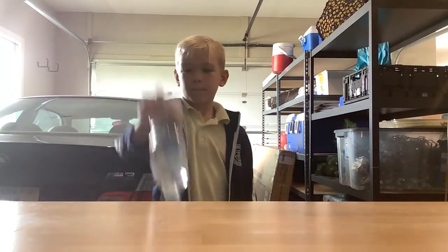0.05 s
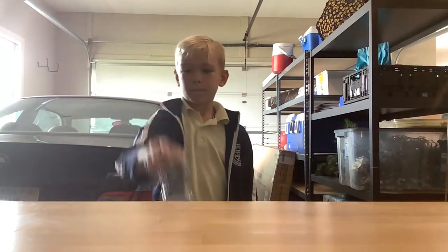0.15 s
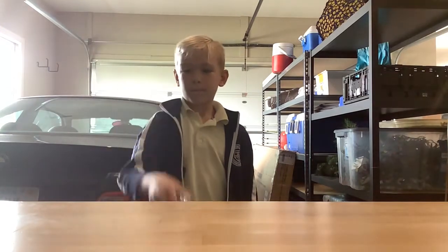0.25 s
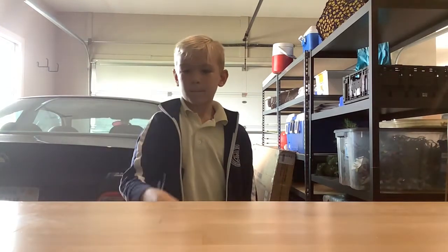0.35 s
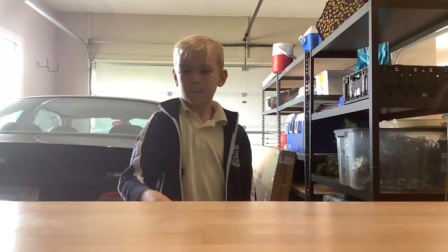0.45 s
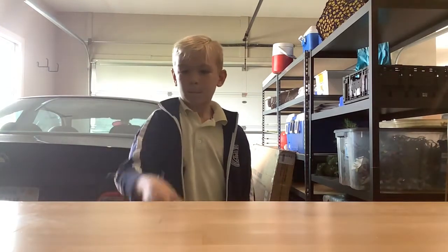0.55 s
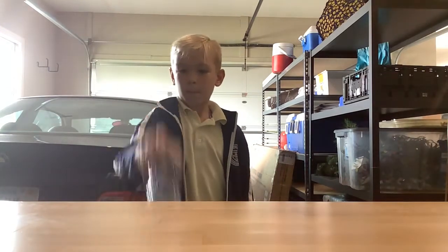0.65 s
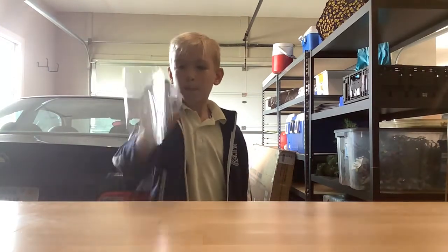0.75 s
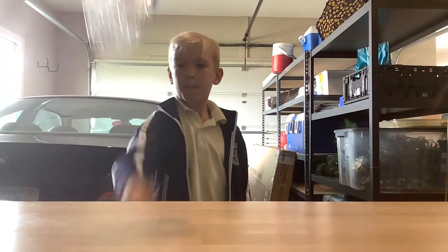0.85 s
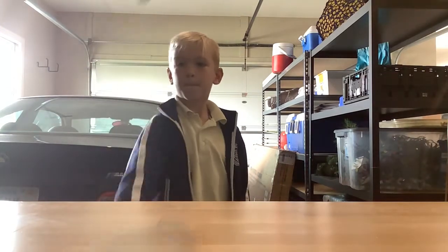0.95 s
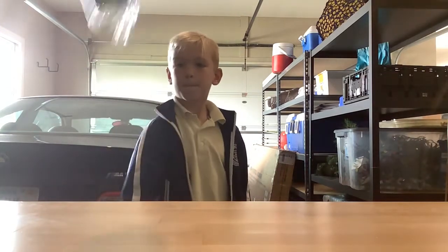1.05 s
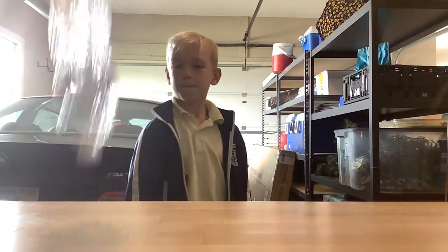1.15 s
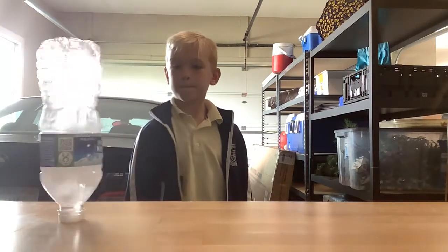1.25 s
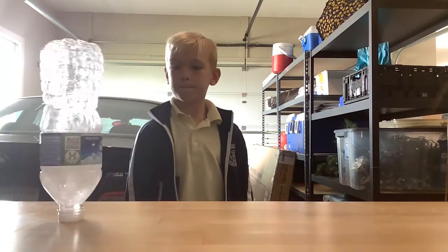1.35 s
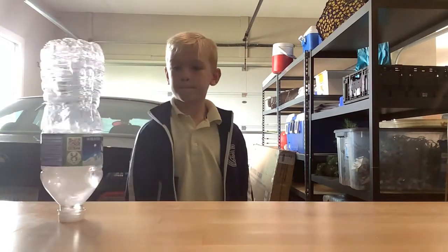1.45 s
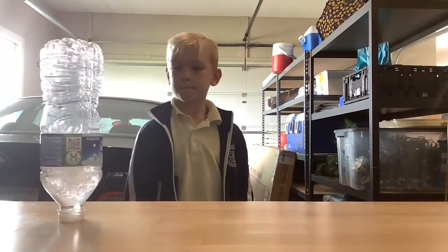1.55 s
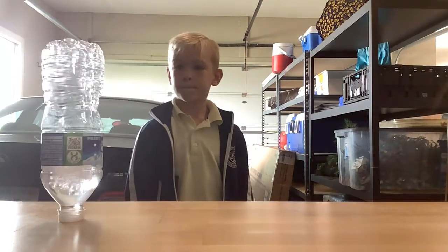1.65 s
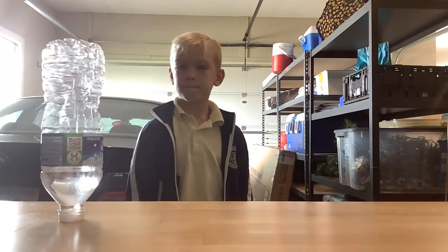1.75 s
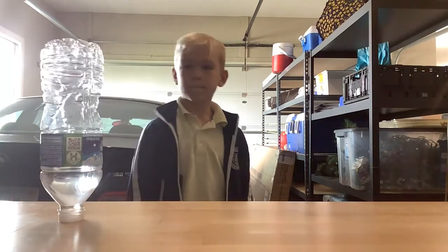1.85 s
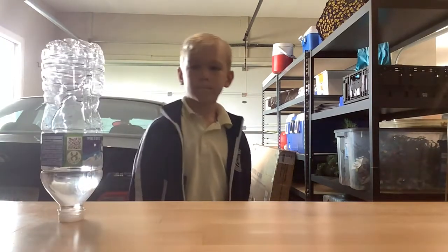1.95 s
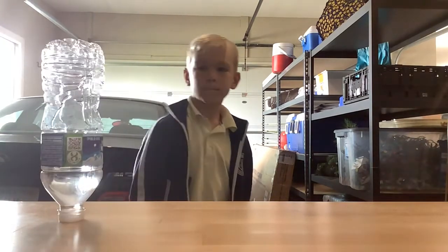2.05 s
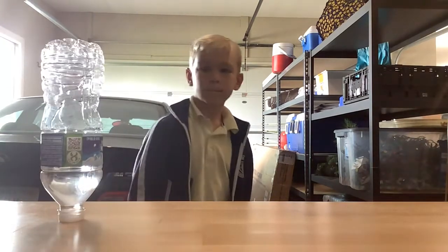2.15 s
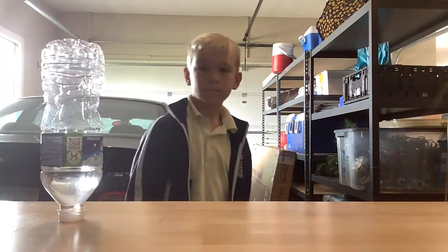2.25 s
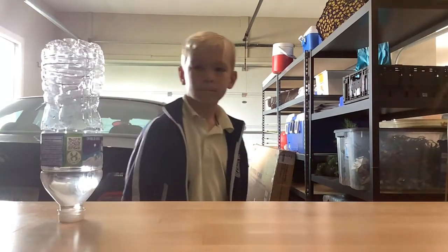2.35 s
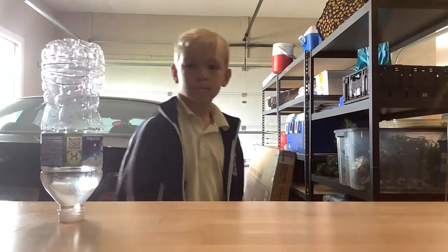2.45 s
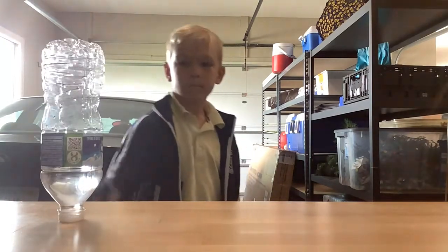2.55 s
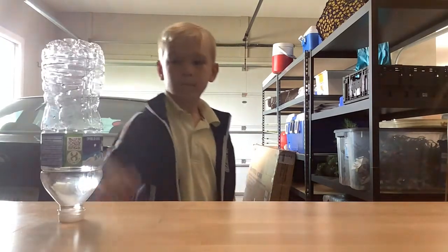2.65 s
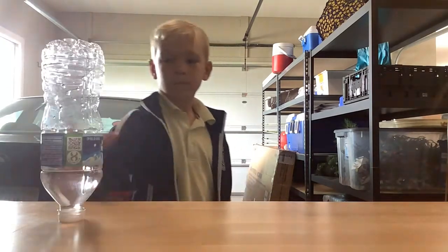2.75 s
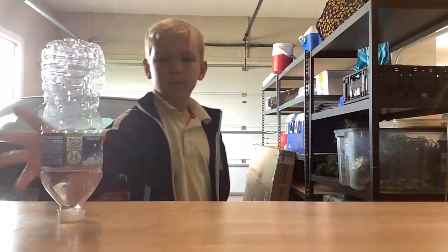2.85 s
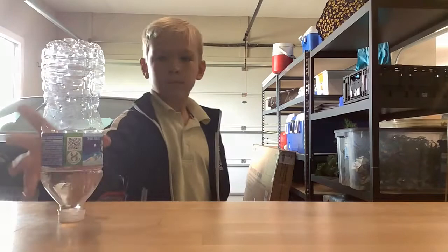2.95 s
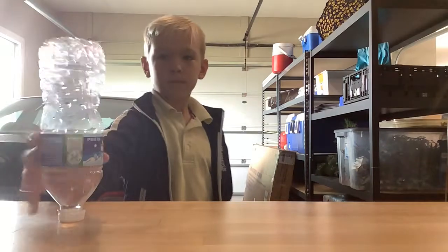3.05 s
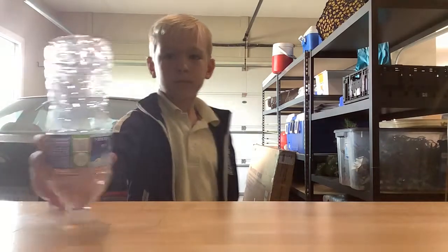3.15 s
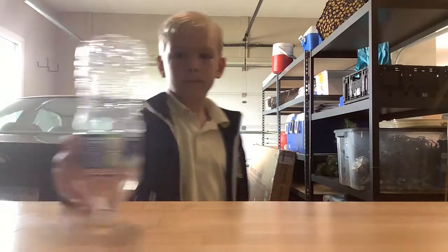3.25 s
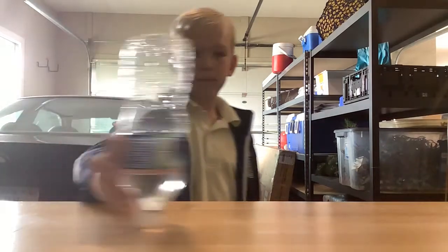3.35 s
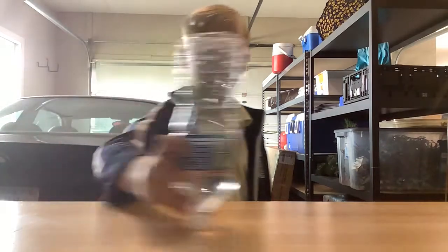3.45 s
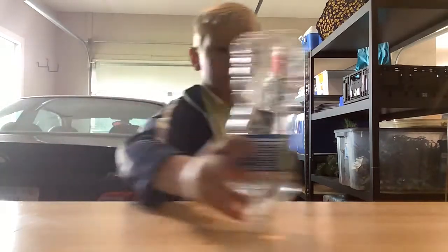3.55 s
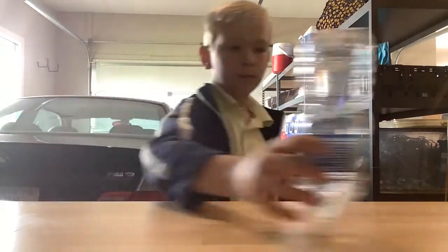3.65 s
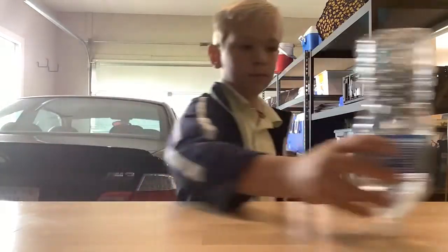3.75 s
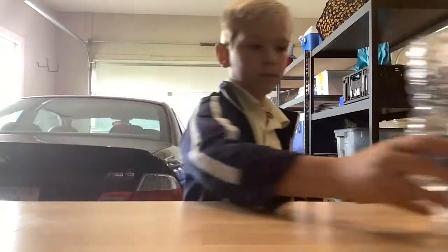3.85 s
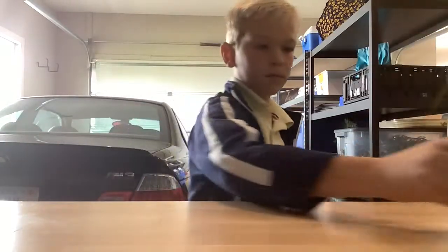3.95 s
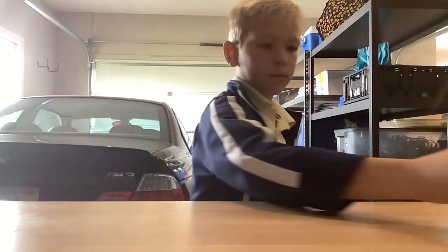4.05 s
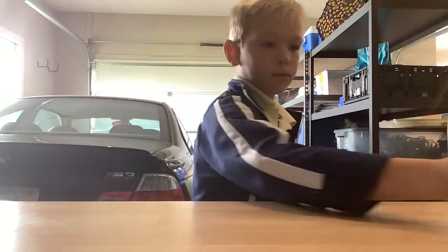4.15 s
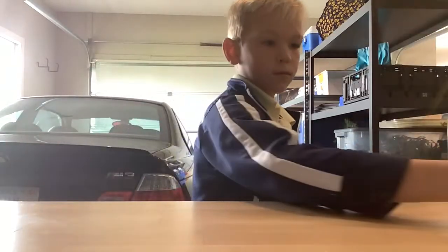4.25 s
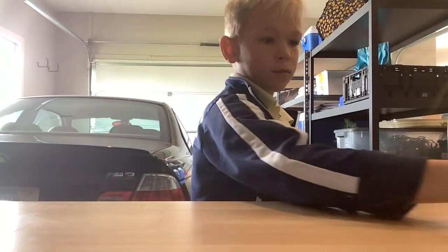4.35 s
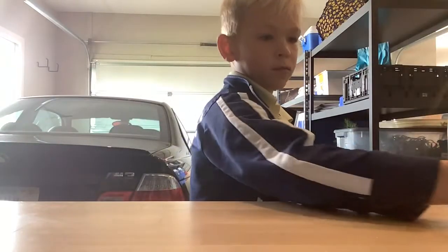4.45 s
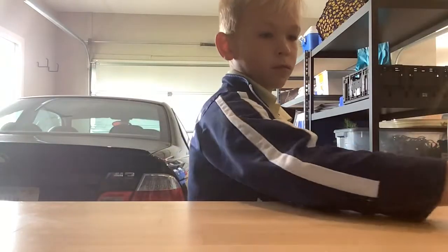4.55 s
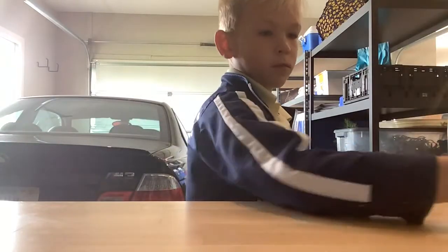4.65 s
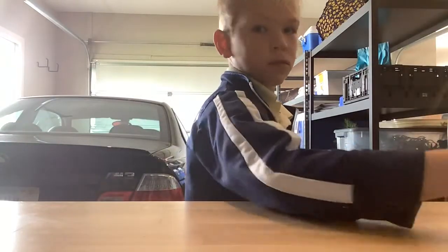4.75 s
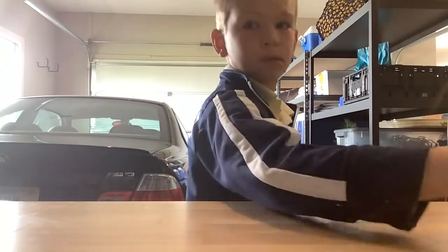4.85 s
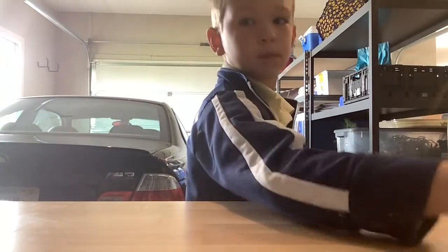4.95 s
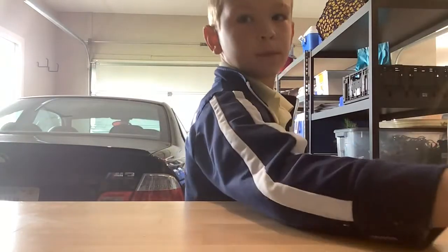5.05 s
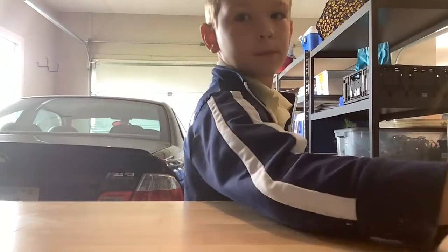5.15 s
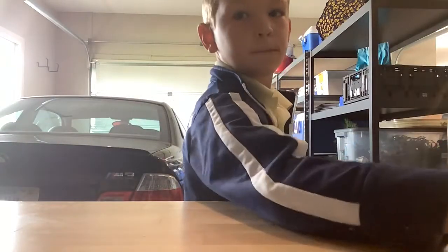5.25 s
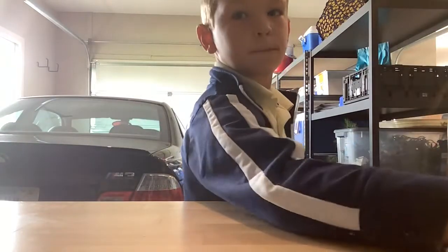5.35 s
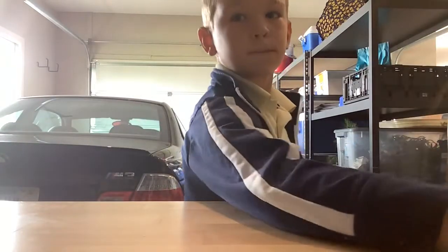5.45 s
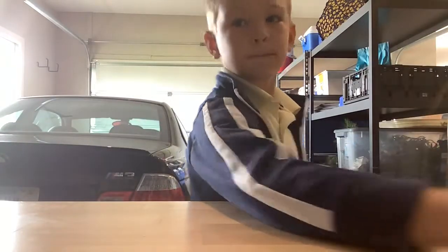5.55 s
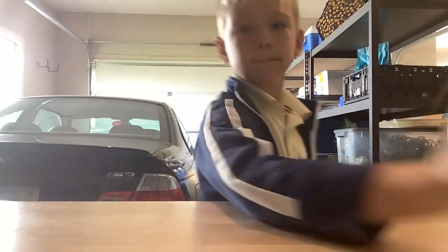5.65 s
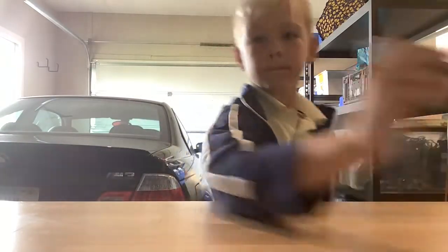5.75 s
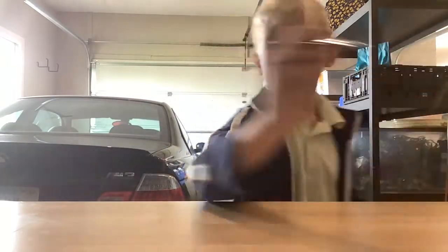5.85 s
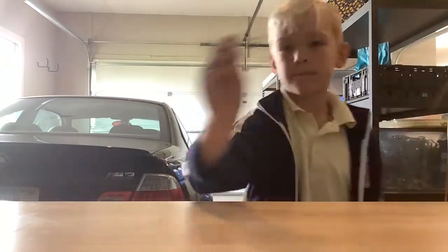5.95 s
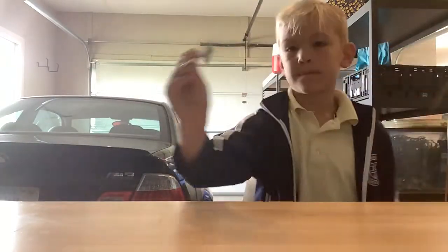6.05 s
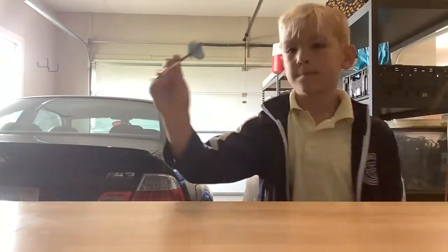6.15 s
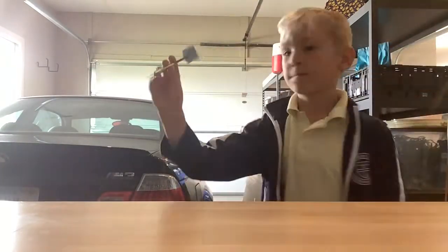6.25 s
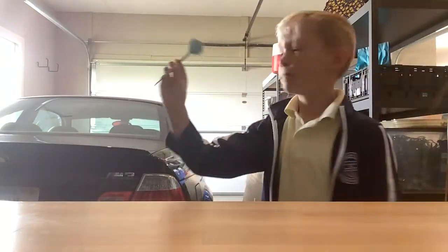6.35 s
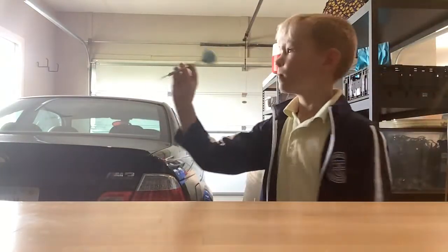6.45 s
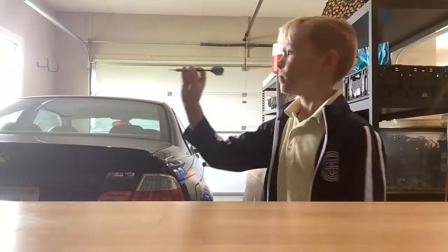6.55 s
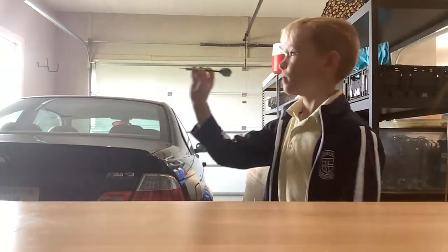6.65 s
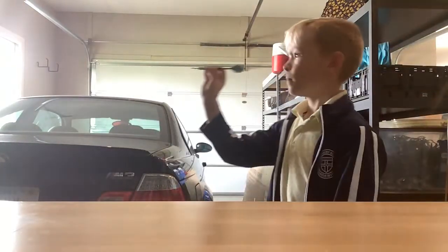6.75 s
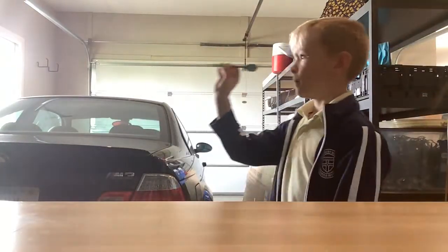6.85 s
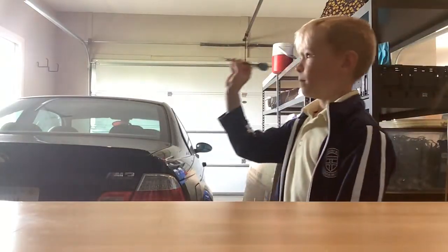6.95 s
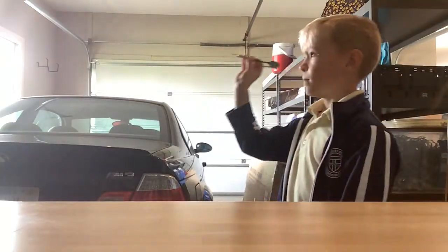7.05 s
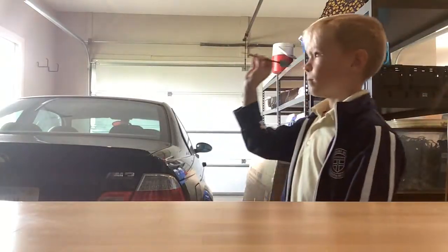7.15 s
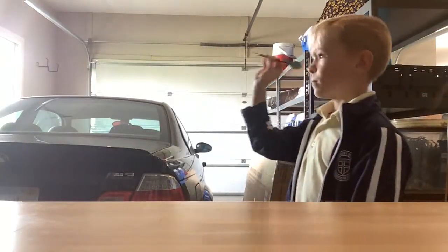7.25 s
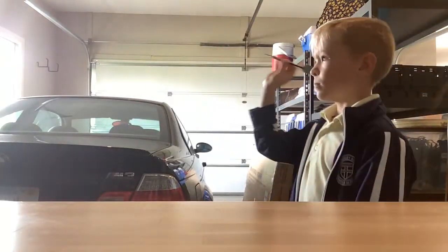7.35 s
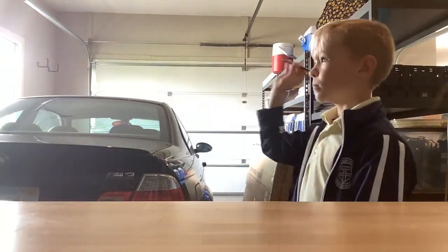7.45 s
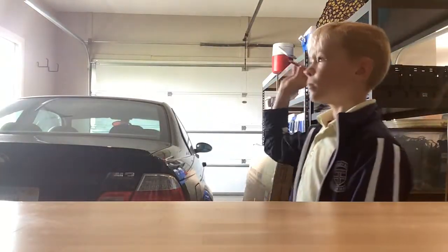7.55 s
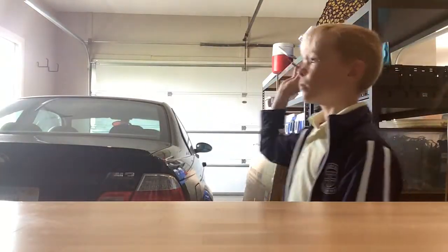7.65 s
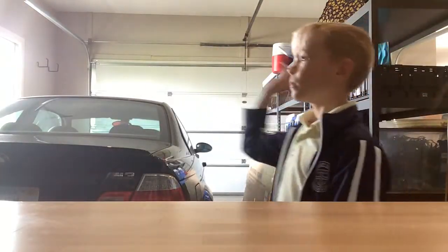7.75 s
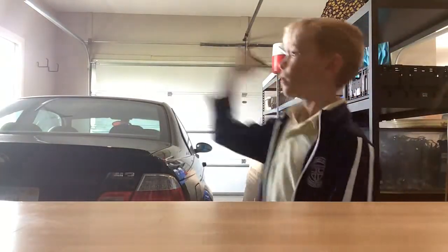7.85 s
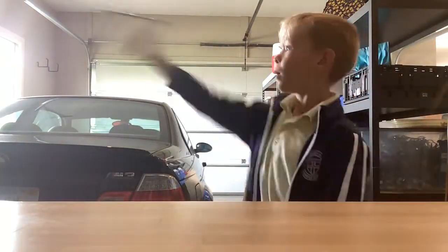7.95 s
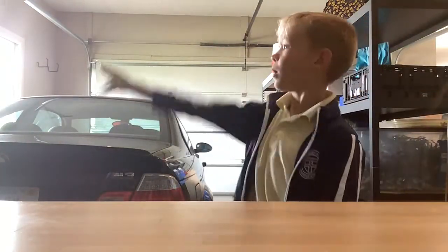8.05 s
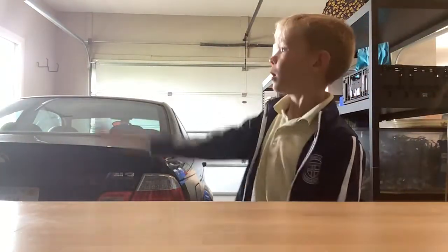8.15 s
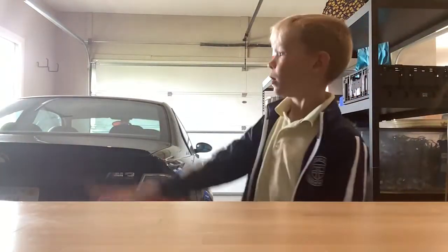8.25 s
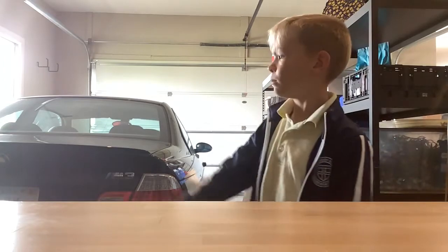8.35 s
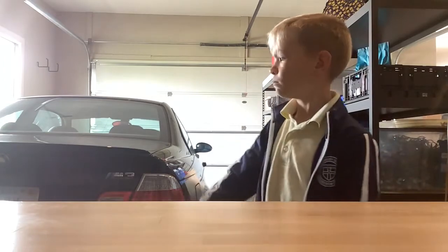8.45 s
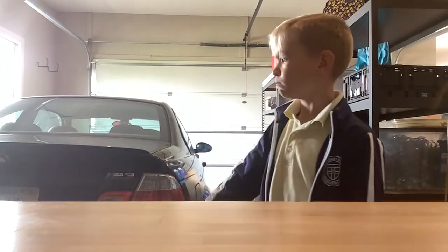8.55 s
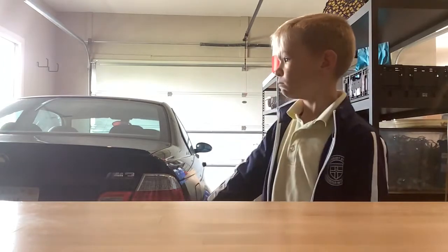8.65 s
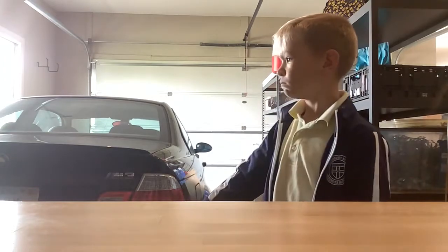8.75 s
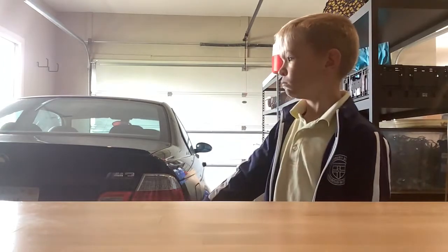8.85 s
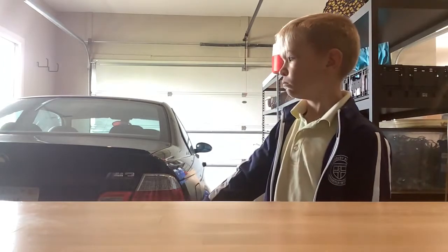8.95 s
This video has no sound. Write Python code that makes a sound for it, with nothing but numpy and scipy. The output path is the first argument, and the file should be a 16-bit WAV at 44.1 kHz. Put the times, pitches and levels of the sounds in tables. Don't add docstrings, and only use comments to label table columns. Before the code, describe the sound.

Close to the microphone in a reverberant concrete garage, a tossed plastic water bottle ticks and sloshes, then lands cap-first on a wooden table with a very loud double crack and fizzing spray. It drags aside with hiss, judder and small squeaks. Plastic crackles and clicks as a dart is picked up; after quiet, it thuds into a distant board, rattling and ringing out.

```python
import sys
import numpy as np
from scipy import signal
from scipy.fft import rfft, irfft, next_fast_len
from scipy.io import wavfile
from scipy.ndimage import uniform_filter1d

SR = 44100
rng = np.random.default_rng(int(sys.argv[2]) if len(sys.argv) > 2 else 0)


def dump(signal):
    limited = np.clip(np.atleast_2d(signal).T, -1, 1)
    pcm = np.round(limited * 32767).astype(np.int16)
    wavfile.write(sys.argv[1], SR, pcm)


def makeup_ratio(level_db):
    decades = np.asarray(level_db, float) / 20
    return 10 ** decades


N = 396459

# (time [s], peak [dB], contact [ms], slap share [dB])
KNOCKS = [
    (0.769, -28, 0.34, 14),
    (1.1713, 8, 0.23, -47),
    (1.1754, 3, 0.4, -5),
    (1.1791, 2.5, 0.6, 5.5),
    (1.193, -12, 0.9, -2),
    (3.09, -37, 0.91, 7),
    (3.104, -36, 0.89, -10),
    (3.114, -55, 0.66, 1),
    (4.96, -32.5, 0.69, -14),
]


def level(x, db):
    return x * makeup_ratio(db) / np.sqrt(np.mean(x ** 2) + 1e-30)


def colour(x, points):
    hz, db = np.transpose(points)
    grid = np.linspace(1, SR / 2, 2049)
    cep = irfft(np.log(makeup_ratio(np.interp(np.log(grid), np.log(hz), db))))
    cep[1:2048] *= 2
    cep[2049:] = 0
    return signal.oaconvolve(x, irfft(np.exp(rfft(cep))))[:len(x)]


def band(x, lo_hz, hi_hz):
    return signal.sosfilt(signal.butter(2, [lo_hz, min(hi_hz, SR / 2.2)], "bandpass", fs=SR, output="sos"), x)


def lows(x, hz):
    return signal.sosfiltfilt(signal.butter(2, hz, fs=SR, output="sos"), x)


def ring(x, hz, t60):
    pole = np.exp(2j * np.pi * hz / SR - np.log(1000) / (t60 * SR))
    return signal.lfilter([0, pole.imag], [1, -2 * pole.real, abs(pole) ** 2], x)


def walk(size, rate):
    hold = int(SR / rate)
    steps = np.repeat(rng.standard_normal(size // hold + 1), hold)
    return 1.5 * uniform_filter1d(steps, hold)[:size]


def grains(size, rate, spread_db):
    chance = rng.random((2, size))
    height = makeup_ratio(-spread_db * np.log(chance[1] + 1e-4)) * np.sqrt(SR / rate)
    clicks = (chance[0] < rate / SR) * height
    return rng.standard_normal(size) * (1 + .5 * clicks)


def patchy(x, rate, depth_db):
    size = next_fast_len(len(x))
    spectrum = rfft(x, size)
    place = 4 * np.log2(np.maximum(np.arange(len(spectrum)) * SR / size, 500) / 500)
    out = np.zeros(len(x))
    for k in range(22):
        patch = irfft(spectrum * np.clip(1 - abs(place - k), 0, 1), size)[:len(x)]
        out += patch * makeup_ratio(depth_db * walk(len(x), rate))
    return out


def add(out, start, x):
    x = x[:len(out) - start]
    out[start:start + len(x)] += x


def push(ms):
    size = max(int(ms * SR / 1000), 1)
    force = np.sin(np.pi * (np.arange(size) + .5) / size)
    return force / force.sum()


def two_bands(x, db, treble_db, lo_hz, hz):
    low, top = lows(x, hz), x - lows(x, 11500)
    high = x - low - top + top * makeup_ratio(.5 * np.minimum(treble_db + 5.5, 0))
    return makeup_ratio(db) * (low / np.std(band(x, lo_hz, hz)) + makeup_ratio(treble_db) * high / np.std(x - low))


def surges(table):
    start = int(table[0][0] * SR) - SR // 5
    s, db, rise, fall, *extra = np.transpose(table)[:, :, None]
    late = ((start + np.arange(SR)) / SR - s) * 1000
    drop = 20 * np.where(late < 0, -late / rise, late / fall)
    power = makeup_ratio(2 * np.maximum(db - drop, -200))
    total = power.sum(axis=0)
    return start, 10 * np.log10(total), [(power * e).sum(axis=0) / total for e in extra]


def snaps(table, share):
    out, t = np.zeros(N), np.arange(SR // 4) / SR * 1000
    spread = 1 + max(share, .03)
    for s, db, hz, rise, fall in table:
        onset = (t / max(rise, .05)) ** 2
        decay = np.exp(-(np.maximum(t - rise, 0) / max(fall, .3)) ** 1.4)
        burst = np.where(t < rise, onset, decay) * grains(len(t), rate=2100, spread_db=2.0)
        burst = band(burst, hz / spread, hz * spread)
        burst = band(burst, hz / spread ** 0.58, hz * spread ** 1.1)
        add(out, int(s * SR), makeup_ratio(db) * burst / abs(burst).max())
    return out


def bumps(table, t60, ms, gain_db):
    out, click = np.zeros(N), np.eye(1, SR // 4)[0]
    t = np.arange(int(ms * SR / 1000)) / SR
    for s, db, hz in table:
        shake = np.hanning(len(t)) * np.cos(2 * np.pi * hz * t) / (len(t) / 4)
        add(out, int(s * SR), makeup_ratio(db + gain_db) * np.convolve(ring(click, hz, t60), shake))
    return out


def knocks():
    # (frequency [Hz], width [Hz], level [dB])
    top_modes = [(129, 150, 2), (374, 51, -0.5), (528, 57, -7.5), (926.3, 200, -12), (1320, 49, -10),
                 (1468.6, 88.6, -13), (1800, 95, -11), (2229, 74, -14.5), (2590, 58, -13), (2970, 26, -16),
                 (3189, 39, -15), (3974, 49, -18)]
    bend_ms = 3
    size = next_fast_len(SR // 2)
    click = np.eye(1, size)[0]
    body = band(sum(makeup_ratio(db) * w * ring(click, f, 4.3 / w) for f, w, db in top_modes), 98, 9000)
    body = body / abs(body).max()
    bend = np.exp(-4j * np.pi * bend_ms * np.sqrt(np.arange(size // 2 + 1) * SR / size / 1000))
    out = np.zeros(N)
    for s, db, ms, slap_db in KNOCKS:
        slap = makeup_ratio(slap_db) * band(click, 400, 5000) / 0.064
        blow = np.convolve(body + slap, push(max(ms, .05)))[:size]
        blow = irfft(rfft(blow) * bend, size)[:size // 2]
        add(out, int((s - .0008) * SR), makeup_ratio(db - 4) * blow / abs(blow).max())
    return out


def legs():
    # (frequency [Hz], level [dB], t60 [s])
    frame = [(67, -41.5, 1.0), (94, -39, 0.99), (150.46, -34, .9)]
    click = np.eye(1, N, int(KNOCKS[3][0] * SR))[0]
    return sum(makeup_ratio(db) * ring(click, f, t60) for f, db, t60 in frame)


def bottle_skin():
    # (time [s], peak [dB], centre [Hz], rise [ms], fall [ms])
    ticks = [
        (.531, -34.5, 1800, 0.41, 3.1),
        (.5354, -27.5, 7700, 0.31, 2.4),
        (1.1505, -31, 1640, 2.8, 24),
        (2.2994, -54.5, 9020, 0.45, 3.7),
        (3.0385, -54.5, 8990, 2.05, 5.7),
        (3.091, -55, 900, 0.54, 6),
        (4.5486, -41.5, 2450, 0.86, 4),
        (4.5486, -42, 8840, 0.92, 3),
    ]
    crinkles = [(.5307, -28, 5700, .13, 2.1), (.7505, -36, 2901, 1.5, 7.4), (.7695, -38.5, 2004, .3, 2.2),
                (.803, -35, 6500, 9, 9), (.805, -34.5, 4194, 8, 14), (.806, -33, 426, 7, 12),
                (.832, -35.5, 4518, 4, 5.5), (.854, -31, 4200, 2.2, 5), (.854, -36.5, 496.7, 3, 7),
                (.872, -34, 4204, 3, 6), (4.66, -61.5, 3461, 9.6, 25), (3.6, -38, 3300, 16, 43),
                (3.778, -37, 4270, 6.6, 8), (4.1, -41, 3870, 5, 13)]
    crush = [
        (1.1675, -8, 2950, 3.6, 3.5),
        (1.1705, -5, 7790, 2.5, 2.5),
        (1.1715, -11.5, 11500, 1.5, 8),
        (1.172, -13, 5500, 2, 9),
        (1.179, -11, 3200, 1.6, 3.3),
        (1.175, -14.5, 8500, 2, 6.3),
        (1.178, -12, 7800, 3.4, 6),
        (1.3, -43, 15000, 1.5, 8),
    ]
    squeaks = [
        (3.5174, -47, 4126, .8, 42.12),
        (4.08, -44, 1437, 7.3, 90),
        (4.24, -53.5, 1501, 34, 158),
        (7.44, -75, 2650, 89, 50),
        (7.63, -73, 2678, 57, 40),
    ]
    creaks = [(1.156, -22.5, 3050, 7.06, 12), (1.157, -29, 7600, 8, 9), (1.159, -34, 5900, 5, 8),
              (1.159, -34.5, 999, 4, 5), (1.171, -12, 1800, 3, 12), (1.194, -25.5, 6600, 6, 30),
              (1.216, -28.5, 1800, 5, 18), (.749, -37, 425.2, 3, 8), (.7705, -34, 400, 2, 16),
              (.853, -41, 950, 3, 8), (.773, -44, 5560, 4, 12), (.81, -35.5, 4000, 6, 6)]
    out = snaps(ticks, 1.5) + snaps(crinkles, 0.54) + snaps(crush, .4)
    return out + snaps(squeaks, 0.034) + snaps(creaks, 0.11)


def water():
    # (time [s], level [dB], rise [ms], fall [ms], hollowness [0-1])
    slosh = [
        (.539, -42.5, 1, 7, 0),
        (.543, -52.5, 2, 230, .05),
        (.776, -49.5, 70, 40, 0.7),
        (.81, -43, 36, 78, 0.2),
        (.862, -44, 60, 82, 0.4),
        (.928, -53, 90, 130, .3),
    ]
    # (time [s], level [dB], rise [ms], fall [ms])
    splash = [
        (1.192, -22.5, 3, 280),
        (1.36, -35, 160, 240),
    ]
    # (frequency [Hz], density [dB per Hz])
    slosh_colour, spray_colour = [(290, -32), (500, -3.5), (613, -3.5), (880, -7.5), (974, -3.5),
                                  (1060, -8), (1460, -11.5), (4660, -5.5), (5090, -4.5), (12900, -21),
                                  (16000, -32.5)], [(150, -41), (250, -9), (273, -12), (360, -5.5), (429, -5),
                                                 (802, -3.5), (1240, -9), (1350, -2.5), (2160, -16),
                                                 (2860, -8.5), (5830, -14), (9170, -15), (16000, -39.5)]
    out = np.zeros(N)
    start, db, (hollow,) = surges(slosh)
    treble_db, boom_db = -1 - 21.5 * hollow, -14 + 24.5 * hollow
    fizz = colour(grains(len(db), rate=900, spread_db=1.0), slosh_colour) * makeup_ratio(.8 * walk(len(db), 46))
    boom = band(ring(rng.standard_normal(len(db)), 380, 0.014), 250, 900)
    add(out, start, two_bands(fizz, db - 1.0, treble_db, 1500, 8000))
    add(out, start, makeup_ratio(db + boom_db - 1) * level(boom, 0))
    start, db, _ = surges(splash)
    treble_db = np.maximum(-5 + 0.71 * (db + 32.0), -40)
    spray = colour(grains(len(db), rate=2200, spread_db=0.9), spray_colour) * makeup_ratio(1.7 * walk(len(db), 70))
    add(out, start, two_bands(spray, db - 3.0, treble_db, 500, 6600))
    return out


def catches():
    # (time [s], peak [dB], pitch [Hz])
    lift = [
        (4.545, -47, 100),
    ]
    table_bumps, bottle_bumps = [(3.055, -33.5, 129), (3.273, -37.5, 131), (3.397, -36, 143),
                                 (3.538, -38, 155.5), (3.609, -40, 143), (3.684, -34.5, 141),
                                 (3.807, -40, 141.5), (3.884, -55, 145), (3.935, -60, 140),
                                 (3.985, -59, 129), (4.057, -41, 154), (4.118, -41.5, 143),
                                 (4.403, -43, 134.3), (4.503, -44, 145)], [(3.037, -51, 365), (3.084, -39.5, 348),
                                                      (3.112, -39, 335), (3.218, -44, 373),
                                                      (3.25, -37, 393), (3.319, -40.5, 469),
                                                      (3.382, -32.5, 381), (3.429, -28, 384.7),
                                                      (3.48, -32, 396), (3.529, -40, 449),
                                                      (3.582, -32, 380.5), (3.626, -30.5, 384),
                                                      (3.673, -34, 369), (3.744, -35.5, 390),
                                                      (3.794, -27, 366.4), (3.833, -44, 387),
                                                      (3.867, -36, 401), (3.911, -35, 396),
                                                      (3.962, -38, 390), (3.99, -34.5, 374),
                                                      (4.043, -35, 380), (4.077, -40, 363),
                                                      (4.149, -33.5, 370), (4.199, -28, 374),
                                                      (4.3, -39.5, 389), (4.339, -35.5, 374),
                                                      (4.462, -43, 374), (4.508, -45, 362)]
    out = bumps(lift, .25, 20, 0)
    return out + bumps(table_bumps, 0.34, 13, -1.5) + bumps(bottle_bumps, 0.17, 8.2, -1.5)


def cap_hiss(slips, pace):
    # (frequency [Hz], density [dB per Hz])
    varnish = [(530, -36), (900, -11.5), (1290, -6.5), (1490, -2), (1700, -16.5), (1920, -3), (2140, -12.5),
               (3040, -5), (4800, -13.5), (7310, -7.5), (9530, -4.5), (14200, -9), (16000, -16.5)]
    # (frequency [Hz], width [Hz], level [dB])
    cap = [(2375, 190, -17), (3430, 790, -29), (3740, 260, -11), (5700, 900, -19), (6600, 130, -28.5)]
    size, streak_db = len(slips), 2.2
    hiss = colour(grains(size, rate=1200, spread_db=1.1), varnish) * makeup_ratio(walk(size, 45))
    hiss = level(patchy(hiss, rate=14, depth_db=1.6), 0)
    for f, w, db in cap:
        mode = level(band(slips, f - w / 2, f + w / 2), db - 8.0)
        hiss = hiss + makeup_ratio(streak_db * walk(size, 9.1)) * mode
    rim_hz = 7000 + 3190 * pace
    rim = np.sin(2 * np.pi * np.cumsum(rim_hz) / SR) * lows(slips, 650)
    hiss = hiss + makeup_ratio(streak_db * walk(size, 12)) * level(rim, -12.5)
    song = np.zeros(size)
    for f in 1600 * 6.5 ** rng.random(13):
        song += makeup_ratio(1.5 * streak_db * walk(size, 16.26)) * level(ring(slips, f, .017), -25)
    drift = np.cumsum(1 + .03 * walk(size, 4))
    return hiss + np.interp(drift, np.arange(size), song)


def drag():
    # (time [s], pressure as hiss [dB], speed [0-1])
    pull = [(2.995, -70, 0.5), (3.215, -65, 0.52), (3.241, -50, 0.65), (3.506, -48.5, 0.81),
            (3.52, -48, 0.92), (3.7, -48, 0.89), (3.85, -46, 0.84), (4.04, -51.5, 0.8), (4.1, -55, 0.65),
            (4.336, -59.5, 0.47), (4.5, -67.5, 0.02), (4.535, -84, 0.45)]
    # (frequency [Hz], width [Hz], level [dB])
    modes = [(143.2, 70, -11.5), (150, 38, -12.5), (383.5, 29, -4), (466, 30, -14), (596, 74, -3.5),
             (703, 34, -9.5), (785, 98, -1.5), (1080, 280, -10.5), (1532, 45, -17)]
    s, pressure, speed = np.transpose(pull)
    t = s[0] + np.arange(2 * SR) / SR
    fade = np.clip(np.minimum(t - s[0], s[-1] - t) / 0.024, 0, 1)
    db, pace = np.interp(t, s, pressure), np.interp(t, s, speed)
    slips = grains(len(t), rate=150, spread_db=0.7) * makeup_ratio(1.2 * walk(len(t), 30))
    rings = [makeup_ratio(g_db + 1.5 * walk(len(t), 14)) * np.sqrt(w) * ring(slips, f, 2 / w) for f, w, g_db in modes]
    judder = makeup_ratio(-48 + 0.32 * (db + 51.5)) * level(band(sum(rings[:3]), 110, 690), 0)
    scrape = makeup_ratio(-45.74 + 0.6 * (db + 47)) * level(band(sum(rings[3:]), 510, 2020), 0)
    hiss = two_bands(cap_hiss(slips, pace), db - 1.5, -23.5 + 25.5 * pace, 1980, 6400)
    out = np.zeros(N)
    add(out, int(s[0] * SR), fade * (judder + scrape + hiss))
    return out


def dart():
    # (time [s], peak [dB], contact [ms])
    hits = [
        (8.4183, -28.5, 0.28),
        (8.4208, -19, 0.82),
        (8.4271, -9.5, 1.87),
        (8.4349, -5, 1.75),
        (8.4478, -14, 1.05),
        (8.4584, -12.5, 1.4),
        (8.472, -13.5, 2.6),
        (8.484, -14.5, 2.05),
    ]
    # (frequency [Hz], level [dB], t60 [s])
    board, shelves = [(113, -17, 0.078), (145, 6, 0.11), (165, 1, 0.068), (202, -1.5, 0.062),
                      (249.3, -18.5, 0.089), (309, -1, 0.087), (397, -5, 0.03), (522, -2.5, 0.033),
                      (750, -16, 0.05), (1235, -12, .06), (1700, -24, .05), (2300, -28, .05),
                      (2650, -25, 0.056)], [(1720, -24, 0.73), (2330, -28, 0.66), (3210, -27, 0.72),
                                     (3730, -24.5, 0.53), (4270, -24, 0.61), (6250, -23.5, 0.5)]
    # (frequency [Hz], density [dB per Hz])
    slap_colour = [(350, -41), (600, -0.5), (737, -2), (931, -9), (1180, -2), (1490, -12), (1750, -8.5),
                   (1980, -18), (2310, -9.5), (3210, -12.5), (5120, -23.5), (6290, -23.5), (10700, -26),
                   (16000, -43)]
    boom, slap, click = np.zeros(N), np.zeros(N), np.eye(1, SR)[0]
    for s, db, ms in hits:
        uneven = makeup_ratio(1.5 * rng.standard_normal(len(board)))
        body = sum(makeup_ratio(g_db) * u * ring(click, f, t60) for (f, g_db, t60), u in zip(board, uneven))
        body = np.convolve(band(body, 270, 6000), push(max(ms, .05)))[:len(click)]
        add(boom, int(s * SR), -makeup_ratio(db - 1.5) * body / abs(body).max())
    t = np.arange(len(click)) / SR
    burst = rng.standard_normal(len(t)) * np.minimum(t / 0.0031, 1) * np.exp(-t / 0.012)
    crack = colour(burst, slap_colour)
    crack = crack / abs(crack).max()
    for f, g_db, t60 in shelves:
        steel = level(band(rng.standard_normal(len(t)), f / 1.025, f * 1.025), 0)
        crack = crack + makeup_ratio(g_db - 8.5 - 60 * t / t60) * np.minimum(t / 0.0097, 1) * steel
    add(slap, int(hits[0][0] * SR), makeup_ratio(hits[0][1] + 9) * crack)
    return boom, slap


def hand():
    # (time [s], level [dB], rise [ms], fall [ms])
    rustle = [(4.962, -50.5, 8.7, 79), (4.993, -51, 25, 22), (5.122, -63, 25, 27), (5.186, -44, 12.2, 56),
              (5.234, -49, 34, 67), (5.256, -40, 48, 73), (5.306, -44, 45, 31), (5.368, -53, 44, 90),
              (5.436, -49, 34, 18), (5.456, -37.5, 3.5, 10), (5.5, -50, 79, 40)]
    draw = [
        (5.525, -56.5, 8, 250),
        (5.72, -62.5, 630, 89),
    ]
    sleeve = [
        (7.985, -61, 104, 183),
    ]
    # (frequency [Hz], density [dB per Hz])
    flights, box, nylon = [(350, -32.5), (600, -11.5), (957, -26.5), (1130, -14), (2040, -24),
                           (2990, -12.5), (3300, -19.5), (4340, -6.5), (5050, -10), (6640, -6.5),
                           (9490, -19), (10900, -14), (16000, -37.5)], [(880, -35), (1500, -9), (2230, -18), (2440, -9.5), (3120, -9),
                                            (4120, -3), (6760, -2.5), (8830, -13), (9750, -11.5),
                                            (10500, -22.5), (14900, -18), (16000, -22.5)], [(1760, -54), (3000, -24), (3970, -19), (4440, -27),
                                                         (4730, -4), (5140, -28), (5560, -8), (6480, -12),
                                                         (7670, 4), (9270, -15), (11400, -13), (12700, -4),
                                                         (16000, -15)]
    # (time [s], peak [dB], centre [Hz], rise [ms], fall [ms])
    dart_snaps = [(5.1846, -39, 6320, 1.03, 2.8), (5.232, -33.5, 6500, 2, 4), (4.9625, -44, 4400, 1.5, 3),
                  (5.425, -56.5, 7000, 2, 5), (5.4395, -19, 6600, 4.4, 1.2), (5.4395, -27, 4600, 1.5, 5),
                  (5.44, -39, 1800, 3.01, 14), (5.444, -18, 4700, 5.7, 2), (5.445, -21, 7300, 4.8, 2),
                  (5.44, -25, 10900, 3, 7), (5.449, -25.5, 12000, 3, 1), (5.4497, -15, 4800, 2.3, .7),
                  (5.4497, -16, 7200, 2.5, .7), (5.4505, -28.5, 3000, 1.8, 1), (5.4545, -30, 6800, 1, 3),
                  (5.4755, -37, 4300, 1.5, 5), (5.476, -43.5, 6000, 1.5, 3), (5.498, -39, 4000, 1.2, 2.5),
                  (5.4985, -41, 7200, 1, 2), (5.502, -36, 4000, 1.8, 3), (5.502, -38, 6800, 1.8, 2)]
    out = snaps(dart_snaps, 0.23)
    start, db, _ = surges(rustle)
    crackle = patchy(colour(grains(len(db), rate=1500, spread_db=1.0), flights), rate=30, depth_db=.8)
    add(out, start, two_bands(crackle, db - .3, -7, 3200, 8470))
    for strokes, surface in (draw, box), (sleeve, nylon):
        start, db, _ = surges(strokes)
        rub = patchy(colour(rng.standard_normal(len(db)), surface), rate=25, depth_db=0.8)
        add(out, start, makeup_ratio(db) * level(rub, 0))
    return out


def garage(x):
    # (frequency [Hz], t60 [s])
    decay = [(60, 0.39), (130, 0.36), (300, 0.51), (700, 0.68), (2000, 0.64), (4000, 0.66), (8000, 0.46),
             (14000, 0.21)]
    t = np.arange(SR) / SR
    hz, t60 = np.transpose(decay)
    tail = np.zeros(SR)
    for f in 50 * 2 ** np.arange(0, 8.6, .5):
        fall = makeup_ratio(-60 * t / np.interp(np.log(f), np.log(hz), t60))
        tail += band(rng.standard_normal(SR), f / 1.2, f * 1.2) * fall
    tail = tail * (1 - np.exp(-(t / 0.0026) ** 2))
    tail = tail * makeup_ratio(-60 * (t / .95) ** 6)
    return signal.oaconvolve(x, tail / np.sqrt(np.sum(tail ** 2)))[:N]


def background():
    # (frequency [Hz], level [dB])
    hum_lines = [(59.2, -66), (118.4, -66.5), (177.6, -69), (209.9, -71), (236.9, -59), (355.3, -68.5),
                 (522.2, -78)]
    # (frequency [Hz], density [dB per Hz])
    air = [(20, -44), (48, -15), (146, -7), (241, -9), (270, -14), (347, -3.5), (388, -15), (422, -8),
           (485, -21), (527, -17), (1150, -28), (2080, -42.5), (13500, -48.5), (16000, -59)]
    t = np.arange(N) / SR
    hum = np.zeros(N)
    for f, db in hum_lines:
        hum += makeup_ratio(db + 0.87 + 0.8 * walk(N, 9)) * np.sin(2 * np.pi * (f * t + rng.random()))
    return hum + level(colour(rng.standard_normal(N), air), -57)


def scene():
    # (time [s], level [dB])
    bottle_wet = [
        (.5, -12),
        (1.1, -17),
        (1.3, -11),
        (4.5, -12),
    ]
    bottle = knocks() + legs() + bottle_skin() + water() + catches() + drag()
    fingers = hand()
    boom, slap = dart()
    wet_db = np.interp(np.arange(N) / SR, *np.transpose(bottle_wet))
    sent = makeup_ratio(wet_db) * bottle + makeup_ratio(-30.5) * fingers
    sent = sent + makeup_ratio(-7.5) * boom + makeup_ratio(4) * slap
    return (bottle + fingers + boom + slap + garage(sent) + background())[None]


def follow(x, release_db):
    ramp = release_db * np.arange(len(x)) / SR
    peak = np.maximum.accumulate(20 * np.log10(abs(x) + 1e-9) + ramp) - ramp
    return uniform_filter1d(peak, size=128)


def low_pass(x):
    return signal.sosfilt(signal.butter(12, 16830, fs=SR, output="sos"), x)


def record(dry):
    x = signal.sosfilt(signal.butter(3, 45, "highpass", fs=SR, output="sos"), dry)
    limit_db = -7.5
    x = x * makeup_ratio(-.3 * np.maximum(follow(x[0], release_db=61) - limit_db, 0))
    x = signal.sosfilt(signal.ellip(8, .2, 50, 15800, fs=SR, output="sos"), np.tanh(x))
    return low_pass(x)


dry = scene()
out = record(dry)
dump(out)
```